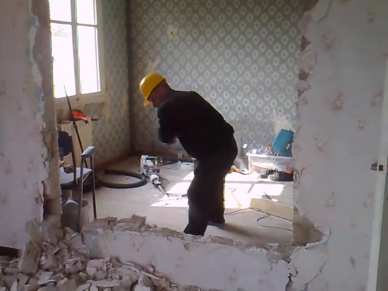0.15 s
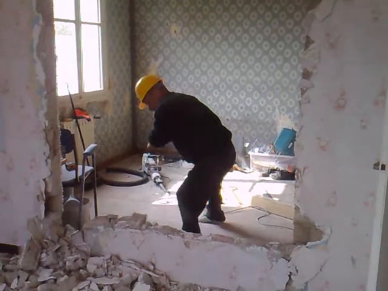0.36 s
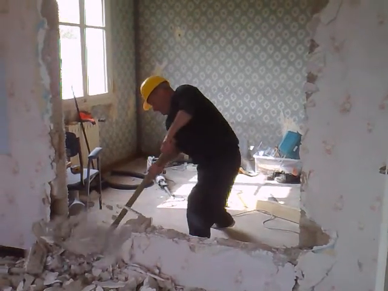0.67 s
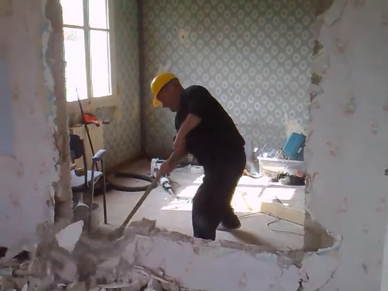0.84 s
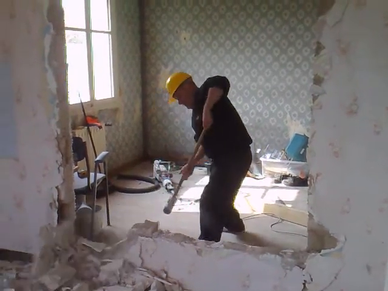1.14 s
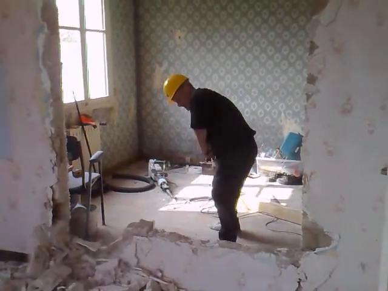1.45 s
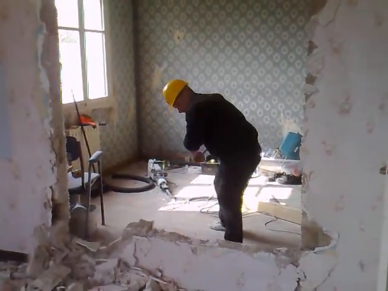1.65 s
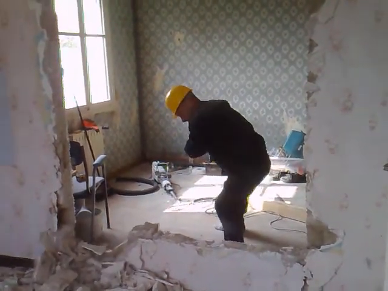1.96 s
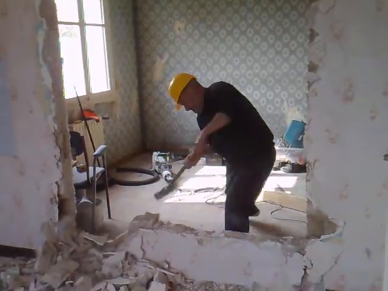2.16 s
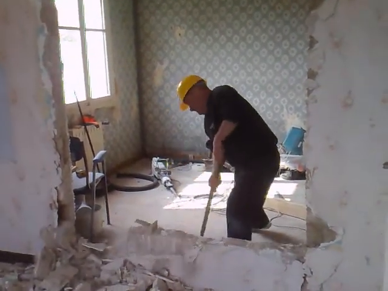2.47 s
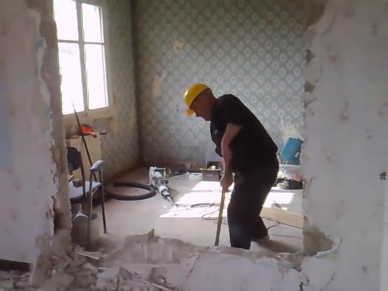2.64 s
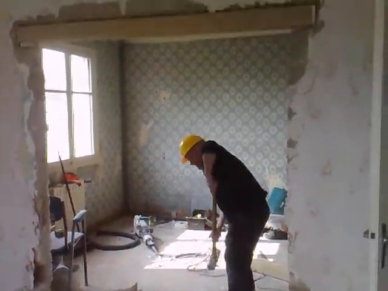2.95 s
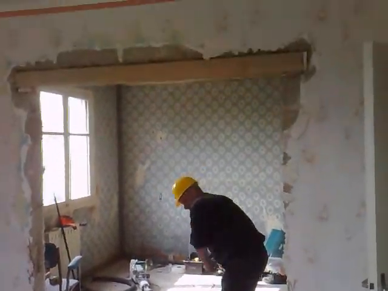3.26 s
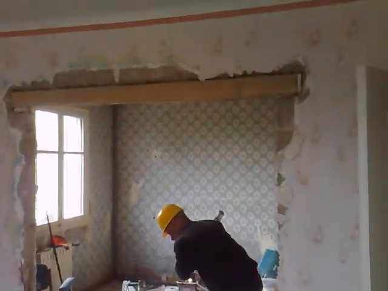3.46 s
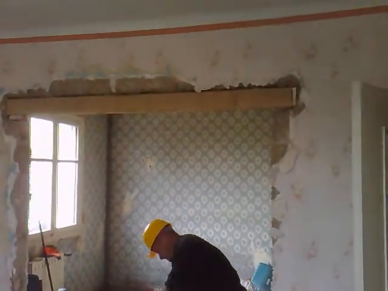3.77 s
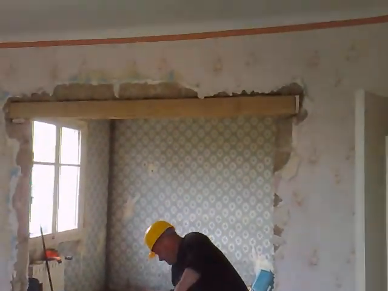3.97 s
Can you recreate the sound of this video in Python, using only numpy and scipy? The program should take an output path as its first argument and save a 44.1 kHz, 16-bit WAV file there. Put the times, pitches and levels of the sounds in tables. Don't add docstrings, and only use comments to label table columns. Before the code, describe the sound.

Sledgehammer hits a plastered masonry wall three times, overloaded and booming in an empty room, with crumbling plaster, pinging shards and thudding lumps between.

```python
import sys
import numpy as np
from scipy import signal
from scipy.fft import rfft, irfft, next_fast_len
from scipy.io import wavfile

SR = 44100
rng = np.random.default_rng(int(sys.argv[2]) if len(sys.argv) > 2 else 0)


def boost(x):
    u = np.asarray(x, float) / 20
    return 10 ** u


def output_pcm(signal):
    pcm = np.clip(np.atleast_2d(signal).T, -1, 1) * 32767
    wavfile.write(sys.argv[1], SR, np.round(pcm).astype(np.int16))


N = 181290

# (time [s], peak level [dB], splitting [dB], boom [dB], crumbling [dB])
BLOWS = [
    (0.7957, -3, -8, 3, -11),
    (2.4422, -3, -10.5, 8.5, -9.5),
    (4.0755, -5, -2.5, -7, -8),
]
# (time [s], peak level [dB], t60 [s])
BOOT_STEPS = [
    (2.299, -56, 0.074),
    (3.586, -33.5, 0.18),
    (3.61, -37, 0.27),
    (3.662, -35, 0.11),
    (3.731, -40, 0.08),
    (3.842, -61, 0.2),
    (4.02, -50, 0.066),
]
# (frequency [Hz], density [dB per Hz])
WALL = [(24, -42), (40, -12), (81, -2), (123, -6), (215, -3), (256, -6), (388, 0), (1080, -9), (1710, -15),
        (2750, -27), (4500, -31), (5850, -61), (9900, -120)]
# (frequency [Hz], density [dB per Hz])
GRIT = [(1500, -29), (3000, -31.5), (5000, 3.5), (7000, 0), (10000, -3), (13000, -4), (15500, -11.5),
        (17000, -25)]
# (frequency [Hz], density [dB per Hz])
SCUFF = [(24, -51.5), (40, -12.5), (104, -10.5), (216, -8), (347, -8), (756, -4.5), (1610, -7), (2890, -17),
         (7000, -37.5), (9100, -60.5), (15400, -120)]
# (frequency [Hz], gain [dB])
SMALL = [(30, -4.5), (60, -25.5), (120, -3), (200, -6.5), (20000, 2)]


def unit(x):
    return x / np.sqrt(np.mean(x ** 2) + 1e-20)


def along(points, hz):
    f, v = np.transpose(points)
    return np.interp(np.log(hz + 1), np.log(f + 1), v)


def coloured(x, spectrum):
    size = 8192
    gain = boost(along(spectrum, np.fft.rfftfreq(size, 1 / SR)))
    cepstrum = irfft(np.log(unit(gain) + 1e-5))
    cepstrum[1:size // 2] *= 2
    cepstrum[size // 2 + 1:] = 0
    return signal.fftconvolve(x, irfft(np.exp(rfft(cepstrum))))[:len(x)]


def grains(count, spread_db):
    sizes = boost(spread_db * np.clip(rng.standard_normal(N * count // SR + 1), -2, 2))
    held = np.repeat(sizes, SR // count + 1)[:N]
    return unit(held * rng.standard_normal(N))


def bursts(times, db, t60, rise):
    t = np.maximum(np.arange(N) / SR - np.asarray(times)[:, None], 0)
    fade_db = np.asarray(db)[:, None] - 60 * t / np.asarray(t60)[:, None]
    return np.sum((1 - np.exp(-t / rise)) * boost(fade_db), axis=0)


def spans(start, length, db, rise_db_per_s, fall_db_per_s):
    t = np.arange(N) / SR - np.asarray(start)[:, None]
    gathering_db = rise_db_per_s * np.maximum(-t, 0)
    stopping_db = fall_db_per_s * np.maximum(t - np.asarray(length)[:, None], 0)
    return boost(np.asarray(db)[:, None] - gathering_db - stopping_db).sum(axis=0)


def room(x, wet_db):
    # (frequency [Hz], t60 [s])
    reverb = [(60, 1.7), (250, 0.99), (1000, 0.76), (3000, 0.93), (6000, 0.37), (10000, 0.27),
              (15000, 0.23)]
    # (frequency [Hz], gain [dB])
    diffuse_tone = [(20, -7.5), (60, -19.5), (150, -2), (300, 2), (16000, -2.5)]
    frame = dict(fs=SR, nperseg=512, noverlap=384)
    hz, _, z = signal.stft(x, **frame)
    keep = boost(-120 * 128 / SR / along(reverb, hz))
    energy = np.array([signal.lfilter([0, 0, 0, 1 - k], [1, -k], p) for k, p in zip(keep, np.abs(z) ** 2)])
    field = signal.stft(rng.standard_normal(N), **frame)[2]
    field = field / np.sqrt(np.mean(np.abs(field) ** 2))
    diffuse = signal.istft(np.sqrt(energy) * field, **frame)[1][:N]
    return x + boost(wet_db) * coloured(diffuse, diffuse_tone)


def standing(x):
    # (frequency [Hz], level [dB], t60 [s])
    modes = [(52, 1, 1.05), (84.5, 1, 1.0), (116, -1, 1.1), (145, 1, .9), (198, 0, .9), (246, -1, 1.0),
             (329, 1, .9), (423, 0, .9)]
    t = np.arange(2 * SR) / SR
    waves = sum(boost(db - 60 * t / t60) * np.sin(2 * np.pi * hz * t) for hz, db, t60 in modes)
    waves = waves * (1 - np.exp(-t / 0.0067))
    return signal.fftconvolve(x, waves / np.linalg.norm(waves))[:N]


def hush():
    # (frequency [Hz], density [dB per Hz])
    hush_tone = [(12, -31), (22, -0.5), (114, 6), (198, -8.5), (326, 0.5), (386, -7.5), (771, -11.5),
                 (1820, -13), (2930, -18), (6000, -26.5), (7800, -58), (13200, -120)]
    level_db = -60.5 - 0.5
    return boost(level_db) * coloured(rng.standard_normal(N), hush_tone)


def boots():
    # (frequency [Hz], density [dB per Hz])
    sole = [(24, -46), (40, -9.5), (238, -3.5), (373, -22), (413, -18.5), (1770, -28), (2500, -50),
            (3250, -83), (5500, -120)]
    # (frequency [Hz], density [dB per Hz])
    cloth = [(180, -45), (300, -13), (872, -2), (1210, -4), (1440, -4.5), (2230, -2.5), (9000, -24.5),
             (11700, -49), (19800, -120)]
    # (time [s], length [s], level [dB])
    swings = [
        (2.29, 0.1, -54.5),
        (3.185, 0.036, -53),
        (3.33, 0.028, -58.5),
        (3.595, 0.032, -57.5),
        (3.949, 0.09, -59),
    ]
    s, db, t60 = np.transpose(BOOT_STEPS)
    steps = coloured(bursts(s, db - 9.0, t60, rise=0.0023) * rng.standard_normal(N), sole)
    turning = spans(*np.transpose(swings), rise_db_per_s=128, fall_db_per_s=152.5)
    rustle = coloured(boost(-7) * turning * grains(count=300, spread_db=2), cloth)
    return steps + rustle


def boards():
    # (time [s], peak level [dB], frequency [Hz], t60 [s])
    struck = [
        (0.379, -32, 154, 0.27),
        (1.255, -12.5, 130, 0.17),
        (1.43, -12.5, 145.7, 0.24),
        (1.63, -29, 145.5, 0.9),
        (3.329, -41.5, 317, 0.3),
        (3.583, -44, 127.6, 0.3),
        (3.656, -39, 243, 0.49),
        (3.73, -46.5, 236.7, 0.7),
        (3.89, -54, 150, 0.4),
        (4.021, -44.5, 149.3, 0.5),
    ]
    s, db, hz, t60 = np.array(struck).T[..., None]
    t = np.maximum(np.arange(N) / SR - s, 0)
    notes = boost(db - 60 * t / t60) * np.sin(2 * np.pi * hz * t)
    return np.sum(notes * (1 - np.exp(-t / 0.015)), axis=0)


def stream():
    # (time [s], pressure [dB])
    drag = [
        (0.169, -82),
        (0.23, -46),
        (0.3, -40),
        (0.451, -33.5),
        (0.52, -51.5),
        (0.64, -49),
        (0.78, -61),
    ]
    # (time [s], length [s], grit level [dB], lump level [dB])
    slides = [
        (0.857, 0.0089, -34, -29),
        (0.994, 0.016, -37.5, -38),
        (1.088, 0.19, -38, -38),
        (1.188, 0.038, -43.5, -29.5),
        (1.405, 0.027, -36.5, -29),
        (1.768, 0.022, -66.5, -46.5),
        (1.88, 0.014, -69.5, -57.5),
        (2.743, 0.015, -49.5, -43),
        (2.814, 0.041, -40.5, -33.5),
        (2.949, 0.014, -54, -34.5),
    ]
    gather_db_per_s, trickle_db_per_s = 309, 52.5
    s, pressure_db = np.transpose(drag)
    drag_db = np.interp(np.arange(N) / SR, s, pressure_db, -200, -200)
    start, length, grit_db, lump_db = np.transpose(slides)

    def slide(db, stop_db_per_s, trickle_db):
        main = spans(start, length, db, gather_db_per_s, stop_db_per_s)
        return main + spans(start, length, db + trickle_db, gather_db_per_s, trickle_db_per_s)

    drag_grit = boost(-53.5 + 0.5 * (drag_db - pressure_db.max()))
    grit = drag_grit + slide(grit_db, stop_db_per_s=349.5, trickle_db=-23.5)
    lumps = boost(drag_db) + slide(lump_db, stop_db_per_s=199, trickle_db=-12)
    return grit, lumps


def shards():
    # (time [s], peak level [dB], frequency [Hz], t60 [s])
    pings = [(.232, -37, 3780, 0.041), (0.364, -60, 5230, 0.016), (.972, -36, 5540, 0.025),
             (0.989, -37, 9300, 0.091), (1.0, -31, 10740, 0.064), (1.012, -45, 9300, 0.061),
             (1.068, -33.5, 5540, 0.07), (1.07, -26, 2250, 0.064), (1.104, -30, 2930, 0.26),
             (1.105, -39, 6560, 0.13), (1.153, -26, 4900, 0.022), (1.175, -31, 4840, 0.32),
             (1.182, -22.5, 3650, 0.17), (1.205, -22, 2110, 0.24), (1.252, -28, 4370, .03),
             (1.339, -36, 2680, 0.211), (1.41, -17.5, 678, 0.21), (1.469, -28, 2610, 0.11),
             (1.735, -36, 2515, 0.21), (1.782, -59, 7350, .18), (1.60, -41.5, 2770, 0.14)]
    out, t = np.zeros(N + SR), np.arange(SR // 4) / SR
    sand = stream()[0]
    hop_s, shrink = 0.032, 0.87
    tile = []
    for k in range(3):
        landing_s = 1.4541 + hop_s * (1 - shrink ** k) / (1 - shrink)
        tile.append((landing_s, -31 - 3.5 * k, 4450 * 1.008 ** k, 0.13))
    small = []
    for u, v, w, x in rng.random((260, 4)):
        small_db = 20 * np.log10(sand[int(u * N)]) + 2 + 12 * v
        small.append((u * N / SR, small_db, 1500 * 3.2 ** w, 0.013 + 0.046 * x))
    for s, db, hz, t60 in [*pings, *tile, *small]:
        skip_rad = np.cumsum(.025 * rng.standard_normal(len(t)))
        ring = np.sin(2 * np.pi * hz * t + skip_rad) * (1 - np.exp(-t / 0.00087))
        out[round(s * SR):][:len(t)] += boost(db - 60 * t / t60) * ring
    return out[:N]


def ticks():
    # (time [s], peak level [dB], centre frequency [Hz], spit [dB])
    snaps = [(0.23, -40, 10000, 4), (0.3631, -41, 4400, -15), (0.471, -32.5, 4060, 4),
             (0.987, -25, 5460, -2.5), (1.0101, -18, 9370, -8), (1.1828, -26.5, 4820, 3),
             (1.197, -18, 4570, -12), (1.289, -25, 4820, -9), (1.3594, -31, 4090, -7),
             (1.8007, -33, 4700, -18), (1.9924, -29.5, 4480, -16), (2.7597, -27.5, 5100, 0),
             (2.8, -28, 10800, -14), (2.819, -34, 4380, -11.5), (2.9582, -19, 4270, -17)]
    out, t = np.zeros(N), np.arange(SR // 50) / SR
    envelope = boost(-2 - 60 * t / .009) * (1 - np.exp(-t / .0008))
    for s, db, hz, spit_db in snaps:
        spit = np.diff(rng.standard_normal(len(t) + 1))
        snap = np.sin(2 * np.pi * hz * t) + boost(spit_db) * spit
        out[round(s * SR):][:len(t)] += boost(db) * envelope * snap
    return out


def chips():
    # (time [s], peak level [dB], dust [dB])
    showers = [
        (0.471, -24.5, -12),
        (1.183, -10, -11),
        (1.3994, -18, -3.5),
        (2.4994, -35, -5),
        (2.5542, -27, 0.5),
        (2.685, -34, -10),
        (2.9387, -27, -16),
        (2.958, -19.5, -17),
        (2.9994, -25, -20),
    ]
    # (frequency [Hz], density [dB per Hz])
    chip_tone = [(1500, -35.5), (2800, -23), (3600, 4), (4600, 6.5), (5500, -6.5), (7500, -38.5)]
    s, db, dust_db = np.transpose(showers)
    t60 = 0.12 + 0 * s
    clatter = bursts(s, db - 14.5, t60, rise=0.0068) * grains(count=700, spread_db=3.5)
    dust = bursts(s, db + dust_db - 9.5, t60, rise=0.0033) * grains(count=1100, spread_db=5)
    return coloured(clatter, chip_tone) + coloured(dust, GRIT)


def knocks():
    out, t = np.zeros(N + SR), np.arange(SR // 10) / SR
    rocks = stream()[1] * (np.arange(N) / SR > BLOWS[0][0])
    for u, v, w, x in rng.random((800, 4)):
        start, hz, t60 = int(u * N), 350 * 7 ** w, 0.014 + 0.05 * x
        size = rocks[start] * boost(3 - 8.3 * w - 3.5 * np.log(v + 0.1))
        out[start:][:len(t)] += size * boost(-60 * t / t60) * np.sin(2 * np.pi * hz * t)
    return room(out[:N], wet_db=-2.5)


def rubble():
    # (time [s], peak level [dB], thud [dB])
    pieces = [(0.2277, -20.5, -10.5), (0.362, -39, 28), (0.4693, -31.5, -3), (0.9716, -18, 15.5),
              (0.9862, -16.5, 3), (1.0101, -24, -6), (1.1034, -28, -8), (1.1548, -18, 5),
              (1.1848, -20, 0.5), (1.2105, -22, 6.5), (1.2925, -22, 16), (1.3588, -25, 4),
              (1.4004, -21, -4), (1.4135, -21, 15), (1.4414, -29.5, 29), (1.5474, -32, 32),
              (1.645, -45, 36.5), (1.7784, -46.5, -1), (1.7994, -53, 9), (1.993, -52.5, 15.5),
              (2.759, -21, -5), (2.7955, -19, -5), (2.818, -24.5, -9.5), (2.8504, -37, 11), (2.937, -32, 6),
              (2.959, -52, 5.5)]
    # (frequency [Hz], density [dB per Hz])
    lump_tone = [(24, -28.5), (40, -4), (228, -13.5), (312, 3), (427, -24), (585, -2), (737, -9),
                 (1050, -10), (1980, -11.5), (3630, -21), (6000, -29.5), (7800, -54), (13200, -120)]
    s, db, thud_db = np.transpose(pieces)
    t60 = 0.037 * np.exp(-0.0312 * (db + 23))
    sand, rocks = stream()
    grit = boost(-7.5) * sand + bursts(s, db - 12.5, 1.02 * t60, rise=0.0022)
    lumps = rocks + bursts(s, db + thud_db - 7.0, 0.8 * t60, rise=0.018)
    lumps = lumps * grains(count=400, spread_db=2.0)
    before = np.arange(N) / SR < BLOWS[0][0]
    gritty = coloured(grit * grains(count=1200, spread_db=1.0), GRIT)
    return gritty + coloured(lumps * before, SCUFF) + coloured(lumps * ~before, lump_tone)


def thuds():
    # (time [s], peak level [dB], t60 [s], boom [dB])
    landings = [(1.206, -13, 0.06, -15), (1.26, -21.5, 0.028, -4.5), (1.316, -15.5, 0.019, 12.5),
                (1.406, -7.5, 0.26, -3.5), (1.467, -8.5, 0.1, -2), (1.524, -28, 0.077, -7.5),
                (1.632, -9, 0.33, -8.5), (1.699, -55.5, 0.072, 0), (2.5, -0.5, 0.072, -10),
                (2.54, -4.5, 0.077, -5), (2.719, -18, 0.07, -2), (2.85, -11.5, 0.031, -0.5),
                (2.944, -19, 0.025, 7)]
    s, db, t60, boom_db = np.transpose(landings)
    push = np.zeros(N)
    push[np.round(s * SR).astype(int)] = boost(db + boom_db + 17.5)
    for start, step_db, _ in BOOT_STEPS:
        push[round(start * SR)] = boost(step_db + 12)
    body = coloured(bursts(s, db - 10.5, t60, rise=0.0031) * rng.standard_normal(N), WALL)
    return room(coloured(body, SMALL), wet_db=-0.5) + standing(coloured(push, SMALL))


def hammer():
    s, db, split_db, boom_db, crumble_db = np.transpose(BLOWS)
    same = 0 * s
    crush = bursts(s, db + 6.5, 0.08 + same, rise=0.003) * rng.standard_normal(N)
    split = bursts(s, db + split_db, 0.045 + same, rise=0.0016) * rng.standard_normal(N)
    crumble = bursts(s, db + crumble_db - 11, 0.13 + same, rise=0.00033) * grains(count=900, spread_db=-9.5)
    noise = coloured(crush, WALL) + coloured(split, SCUFF) + coloured(crumble, GRIT)
    push = np.zeros(N)
    push[np.round(s * SR).astype(int)] = boost(db + boom_db + 16.5)
    lead, t = np.zeros(N), np.arange(SR // 100) / SR
    phase_rad = 2 * np.pi * 2200 * .002 * (1 - np.exp(-t / .002))
    sweep = np.sin(phase_rad) * (t / .003) * np.exp(1 - t / .003)
    for start, lead_db in zip(s - .0025, db - 30 + 14):
        lead[round(start * SR):][:len(t)] += boost(lead_db) * sweep
    return room(noise, wet_db=4.5) + standing(push) + lead


def scene():
    loose = rubble() + boots() + chips()
    heap = room(loose, wet_db=-1.0) + boost(-17.5) * standing(coloured(loose, SMALL))
    pings = room(shards() + ticks(), wet_db=-10)
    return (hush() + boards() + pings + knocks() + heap + thuds() + hammer())[None]


def roll_off(x):
    return signal.sosfilt(signal.butter(12, 15890, fs=SR, output="sos"), x)


def record(dry):
    # (frequency [Hz], gain [dB])
    mic = [(30, -6), (70, 0), (2400, -1), (2900, -5), (4200, -0.5)]
    # (frequency [Hz], density [dB per Hz])
    hiss_tone = [(1470, -49.5), (2500, 0.5), (3080, 1.5), (3790, 2), (15700, -1)]
    # (before [dB], after [dB])
    hiss_levels_db = (-68, -80.5)
    # (frequency [Hz], gain [dB])
    top_cut = [(15800, 0), (15950, -40), (22000, -60)]
    ceiling, knee = .72, 3.0
    hiss_db = np.where(np.arange(N) / SR < BLOWS[0][0], *hiss_levels_db)
    hiss = boost(hiss_db) * coloured(rng.standard_normal(N), hiss_tone)
    heard = coloured(dry[0], mic) + hiss
    limited = heard / (1 + np.abs(heard / ceiling) ** knee) ** (1 / knee)
    size = next_fast_len(N + 8192)
    band = boost(along(top_cut, np.fft.rfftfreq(size, 1 / SR)))
    mix = irfft(rfft(limited, size) * band, size)[None, :N]
    return roll_off(mix)


dry = scene()
out = record(dry)
output_pcm(out)
```